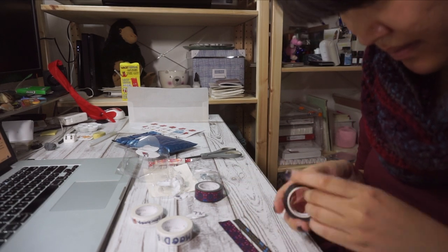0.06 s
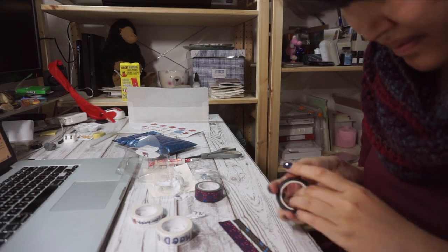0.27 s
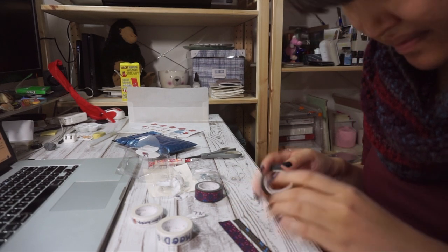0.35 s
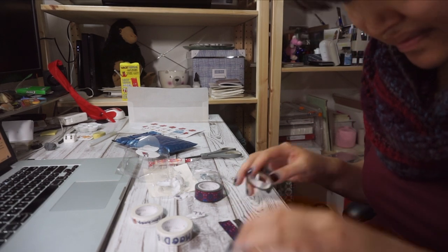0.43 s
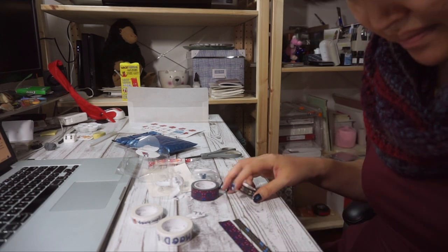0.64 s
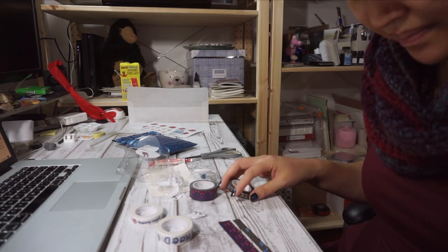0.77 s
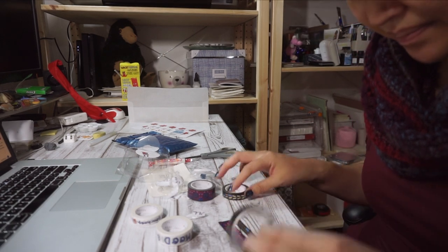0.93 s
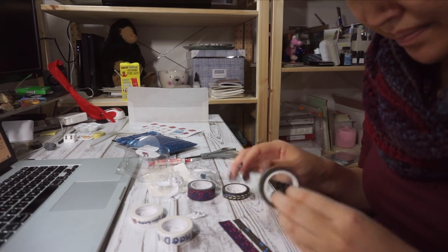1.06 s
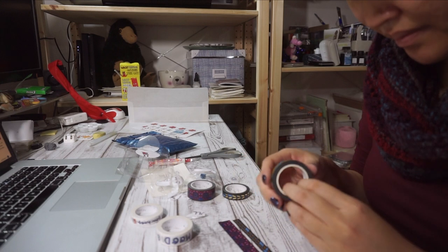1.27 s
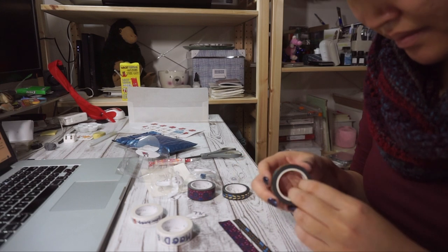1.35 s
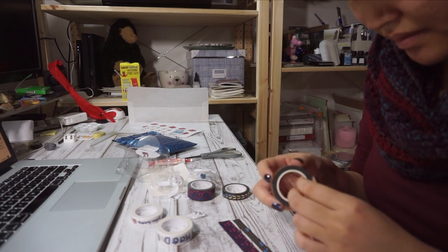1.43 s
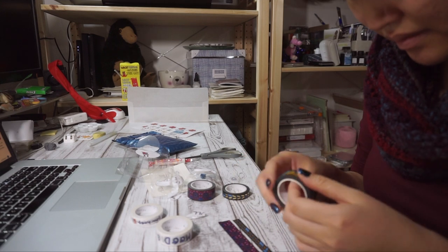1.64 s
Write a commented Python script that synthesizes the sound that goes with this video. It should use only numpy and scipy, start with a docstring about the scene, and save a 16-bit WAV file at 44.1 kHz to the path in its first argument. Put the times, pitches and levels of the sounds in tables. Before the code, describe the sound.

A tape roll knocks on a wooden table, close by, in a small room with steady fan noise and a thin whine. From 0.3 seconds a sleeve brushes softly; from 0.6 come finger bumps, faint nail ticks and light scraping. At 0.9 the roll lands sharply with two quick rebounds and brief wooden ringing. The fan noise dips and creeps back, with two faint bumps around 1.5 and 1.65.

```python
"""A small workroom with steady fan noise: a roll of tape is set down on a wooden table.
A sleeve brushes past, fingers bump the table, nails tick on the roll and it slides in stick-slip.
The roll lands with a sharp knock and two rebounds, ringing the modes of table and roll.
The knock drives a limiter down, so the room noise drops and creeps back."""
import sys
import numpy as np
from scipy import signal
from scipy.fft import rfft, irfft
from scipy.io import wavfile
from scipy.ndimage import uniform_filter1d, minimum_filter1d

SR = 44100
rng = np.random.default_rng(int(sys.argv[2]) if len(sys.argv) > 2 else 0)


def inscribe(sig):
    """Save sig as 16-bit PCM at rate SR to the path in sys.argv[1].

    A 1-D sig is mono; a 2-D sig holds one channel per row.
    Samples are clipped to [-1, 1] before scaling.
    """
    pcm = np.round(np.clip(np.atleast_2d(sig).T, -1, 1) * 32767)
    wavfile.write(sys.argv[1], SR, pcm.astype(np.int16))


N = 74970
TIME = np.arange(N) / SR
BUMP_LOW_HZ = 302
HELD_DAMPING = 1.67   # decay rate factor under a hand
WHITE = [(20, 0), (20000, 0)]   # flat spectrum: (frequency [Hz], density [dB/Hz])
# rim landing and rebounds: (time [s], level [dB], thud re level [dB])
LANDINGS = [(0.8930, 9.5, -13.5), (0.9290, -4.5, -8.5), (0.9470, -1.5, -11.5)]


def knocks():
    """The hard rim lands: clack, thud, crack and a brief rim tone. Returns (contact, wood ringing)."""
    clack_band_hz, thud_band_hz, crack_band_hz = (965, 2140), (312, 720), (5460, 10800)
    clack_top_hz = 3350   # limited by contact duration
    first_db = LANDINGS[0][1]
    contact = 0
    for s, db, thud_db in LANDINGS:
        clack = butter(pulse(s, db, *clack_band_hz), clack_top_hz, "low")
        crack = pulse(s, 2 * db - first_db - 8, *crack_band_hz)   # grows as force squared
        thud = pulse(s, db + thud_db, *thud_band_hz)
        contact += clack + crack - thud
    force = sum(from_db(db) * click(s) for s, db, _ in LANDINGS)
    rim = mode(hz=1897, db=-17.5, t60_s=0.034)
    return contact + signal.fftconvolve(force, rim)[:N], wood(force)


def wood(force, damping=1):
    """Modes of table and roll swell in and ring out, slightly earlier in the left ear."""
    # table and roll modes: (frequency [Hz], level [dB], t60 [s])
    modes = [(336, -36, 0.33), (385, -34, 0.13), (651, -56, 0.99), (687.5, -33, 0.3), (835, -26.5, 0.13),
             (858, -27, 0.13), (1156, -36.5, 0.2), (1303, -37, 0.23), (1443, -32, 0.28),
             (1494, -30.5, 0.26), (1549, -27.5, 0.2), (1740, -49, 0.12), (1787, -38, 0.15),
             (1790, -29, 0.24), (2000, -38.5, 0.5), (2383, -50, .38), (2336, -31, 0.13), (2290, -47, 0.31),
             (2880, -26.5, 0.23), (6350, -43, 0.26)]
    rise_s, lead_s = 0.0052, np.array([[0.00008], [0]])
    ringing = sum((-1) ** k * mode(hz, db, t60_s / damping, lead_s)
                  for k, (hz, db, t60_s) in enumerate(modes))
    swell = 1 - np.exp(-TIME / rise_s)
    return signal.fftconvolve(force[None], ringing * swell, axes=1)[:, :N]


def boom():
    """The table's lowest mode swells after the landing and dies away."""
    mode_hz, rise_s = 111, 0.027
    landing_s, landing_db = LANDINGS[0][:2]
    age_s = np.maximum(TIME - landing_s, 0)
    swell = (age_s / rise_s) ** 2 * np.exp(-age_s / rise_s)
    return from_db(landing_db - 31.5) * swell * np.sin(2 * np.pi * mode_hz * age_s)


def bumps():
    """Soft contacts thud and stir the lower modes, damped by the hand. Returns (thuds, ringing)."""
    # finger and roll bumps: (time [s], level [dB], upper edge [Hz])
    contacts = [(0.5963, -22.5, 1260), (0.605, -16.5, 880), (0.61, -18, 746), (0.6363, -20, 1300),
                (0.6399, -21.5, 880), (0.6940, -25.5, 1850), (0.7315, -44, 3100), (0.754, -22, 2470),
                (0.771, -34, 2000), (1.5088, -28, 450), (1.6524, -34, 392)]
    thuds = sum(pulse(s, db, BUMP_LOW_HZ, top_hz) for s, db, top_hz in contacts)
    force = sum(butter(from_db(db) * click(s), top_hz, "low") for s, db, top_hz in contacts)
    return thuds, from_db(13) * wood(force, HELD_DAMPING)


def slides():
    """The roll sticks and slips in dense tiny clicks that stir the wood. Returns (scrape, ringing)."""
    # strokes over the wood: (start [s], end [s], level [dB], centre [Hz], width [Hz])
    strokes = [(0.574, .63, -33, 351.9, 277.8), (0.577, 0.659, -47, 2890, 700),
               (0.582, 0.652, -51, 4620, 1190), (0.72, 0.853, -39.5, 370, 290),
               (0.744, 0.804, -43, 1296, 1110), (0.81, 0.854, -42.5, 2840, 700),
               (0.824, .864, -57, 4850, 700)]
    slips_per_s, spread_db, edge_s, dull_hz, ring_db = 2500, 4, 0.011, 5960, -4
    scrape = 0
    for start_s, end_s, db, hz, width_hz in strokes:
        sizes = from_db(spread_db * np.minimum(rng.exponential(1, N), 4))
        signs = rng.choice([-1, 1], N)
        slipping = rng.random(N) < slips_per_s / SR
        slips = butter(sizes * signs * slipping, dull_hz, "low", order=1)
        friction = resonate(resonate(slips, hz, width_hz), hz, 2 * width_hz)
        envelope = np.clip(np.minimum(TIME - start_s, end_s - TIME) / edge_s, 0, 1)
        scrape += from_db(db) * envelope * friction
    scrape = butter(scrape, BUMP_LOW_HZ / 2, "high")
    ringing = wood(scrape, HELD_DAMPING)
    return scrape, from_db(ring_db) * ringing * scrape.std() / ringing.std()


def taps():
    """Fingernails tick on the roll, whose hard core rings briefly."""
    # nail taps: (time [s], level [dB])
    ticks = [(0.598, -54), (0.606, -47), (0.620, -51), (0.694, -53), (0.7315, -40), (0.743, -47.5),
             (0.754, -41.5), (0.7659, -41), (0.819, -41), (0.83, -43), (0.845, -50), (0.862, -41.5)]
    # core modes: (frequency [Hz], level [dB], t60 [s])
    core_modes = [(1560, -2, 0.032), (2930, -5.5, 0.028), (3166, -5, 0.045), (4960, -4.5, 0.033),
                  (6200, -2.5, 0.032)]
    force = sum(from_db(db) * click(s) for s, db in ticks)
    ringing = sum(mode(hz, db, t60_s) for hz, db, t60_s in core_modes)
    return signal.fftconvolve(force, ringing)[:N]


def sleeve():
    """Cloth hisses as the arm reaches over the table."""
    # brushing envelope: (time [s], gain [dB])
    brushing = [(.28, -14.5), (.39, -8), (.47, -1.5), (.55, -3.5), (.6, 2), (.67, -8), (.72, -11),
                (.85, -4), (.88, -24)]
    # cloth spectrum at unit gain: (frequency [Hz], density [dB/Hz])
    cloth = [(100, -76.5), (300, -62), (700, -82), (1450, -70), (1800, -76.5), (2500, -74), (3700, -82.5),
             (6500, -83), (8200, -85.5), (9700, -83.5), (15500, -92.5)]
    end_s, fade_s = 0.89, 0.0085
    envelope = from_db(np.interp(TIME, *np.transpose(brushing)))
    fade = np.clip((end_s - TIME) / fade_s, 0, 1)
    return envelope * fade * diffuse(cloth)


def reflections(x):
    """Two near, dulled echoes off laptop and shelves."""
    # echoes: (delay [s], gain [dB], upper edge [Hz], right ear lag [s])
    echoes = [(.0046, -5, 760, 0.000033), (.0103, -13.5, 6500, 0.00059)]
    near = 0
    for s, db, top_hz, lag_s in echoes:
        dulled = butter(x, top_hz, "low", order=1)
        near += from_db(db) * np.array([delay(dulled, s), delay(dulled, s + lag_s)])
    return near


def reverb(x):
    """The room's diffuse tail dies band by band."""
    # room tail: (frequency [Hz], level [dB], t60 [s])
    decay = [(101, 3.5, 0.87), (344, -4.5, 0.58), (680, -5, 0.5), (1400, -5, 0.51), (1970, -1.5, .42),
             (3080, 8.5, 0.39), (4380, 1.5, 0.44), (6840, -8.5, 0.4), (13600, -17, 0.17)]
    gap_s, build_s = 0.0014, 0.002
    white = rfft(diffuse(WHITE) / np.sqrt(SR / 2))
    hz, edges_hz = np.fft.rfftfreq(N, 1 / SR), np.geomspace(60, 18000, 20)
    tail = 0
    for low_hz, high_hz in zip(edges_hz, edges_hz[1:]):
        centre_hz = np.sqrt(low_hz * high_hz)
        rate_per_s = np.log(1000) / at_hz(decay, centre_hz, column=2)
        envelope = np.sqrt(2 * rate_per_s / SR) * np.exp(-rate_per_s * TIME)   # unit energy
        band = irfft(white * (hz >= low_hz) * (hz < high_hz), N)
        tail += from_db(at_hz(decay, centre_hz)) * envelope * band
    tail *= np.clip((TIME - gap_s) / build_s, 0, 1)
    return signal.fftconvolve(x[None], tail, axes=1)[:, :N]


def room_noise():
    """A low steady rush with a thin, wavering fan whine."""
    # steady rush: (frequency [Hz], density [dB/Hz])
    rush = [(20, -75), (47, -66.5), (68, -77), (120, -67), (200, -63.5), (290, -63), (430, -69),
            (550, -75.5), (850, -77), (1060, -85.5), (1400, -78.5), (1750, -93.5), (2200, -96), (4200, -94),
            (5100, -93), (6500, -97.5), (15500, -99)]
    # fan whine: (centre [Hz], width [Hz], rms [dB])
    whine_bands = [(1898, 79, -61.5), (5120, 63, -68)]
    white = diffuse(WHITE)
    whine = sum(from_db(db) * resonate(resonate(white, hz, 2 * width_hz), hz, 2 * width_hz)
                for hz, width_hz, db in whine_bands)
    return diffuse(rush) + whine


def fan_tone():
    """The whine's core: a faint, even tone with slightly wandering pitch."""
    centre_hz, wander_hz, rms_db = 1944, 12.3, -61
    wander = butter(rng.standard_normal(N), 28, "low")
    pitch_hz = centre_hz + wander_hz * wander / wander.std()
    return from_db(rms_db) * np.sqrt(2) * np.sin(2 * np.pi * np.cumsum(pitch_hz) / SR)


def diffuse(spectrum):
    """Stereo noise of a given density, most alike between the ears in the bass."""
    # left-right likeness: (frequency [Hz], coherence [0-1])
    coherence = [(60, .99), (250, 1), (600, 0.8), (1200, 0.48), (2200, 0.58), (4000, 0), (15000, 0)]
    lag_s = np.array([[0], [0.00006]])   # right ear later
    hz = np.fft.rfftfreq(N, 1 / SR)
    alike = at_hz(coherence, hz)
    mid, side = rfft(rng.standard_normal((2, N)))
    pair = np.sqrt((1 + alike) / 2) * mid + np.sqrt((1 - alike) / 2) * side * [[1], [-1]]
    pair *= np.exp(-2j * np.pi * hz * lag_s)
    return irfft(pair * from_db(at_hz(spectrum, hz)) * np.sqrt(SR / 2), N)


def mode(hz, db, t60_s, lead_s=0):
    """Decaying sine; lead_s advances its phase."""
    return from_db(db - 60 * TIME / t60_s) * np.sin(2 * np.pi * hz * (TIME + lead_s))


def pulse(s, peak_db, low_hz, high_hz):
    """Band-limited contact pulse."""
    y = butter(click(s), [low_hz, max(high_hz, 1.2 * low_hz)], "band")
    return from_db(peak_db) * y / abs(y).max()


def click(s):
    """Unit impulse at time s."""
    return signal.unit_impulse(N, int(round(s * SR)))


def resonate(x, hz, width_hz):
    """One resonance, scaled to rms 1."""
    r = np.exp(-np.pi * width_hz / SR)
    y = signal.lfilter([1, 0, -1], [1, -2 * r * np.cos(2 * np.pi * hz / SR), r * r], x)
    return y / y.std()


def butter(x, hz, kind, order=2):
    """Causal Butterworth filter."""
    return signal.sosfilt(signal.butter(order, hz, kind, fs=SR, output="sos"), x + 1e-18)


def delay(x, s):
    """Fractional delay."""
    return np.interp(TIME - s, TIME, x, left=0)


def at_hz(points, hz, column=1):
    """Table column interpolated over log frequency."""
    table = np.array(points)
    return np.interp(np.log(np.maximum(hz, 1)), np.log(table[:, 0]), table[:, column])


def from_db(db):
    """Decibels to gain."""
    return 10 ** (np.asarray(db) / 20)


def scene():
    """Handling sounds in the room, over its steady noise."""
    pan_db, left_lag_s, soft_send_db = 0.17, 0.00004, -5.5
    knock, knock_ring = knocks()
    bump, bump_ring = bumps()
    slide, slide_ring = slides()
    soft = bump + slide + taps()
    contact = knock + soft
    direct = np.array([delay(contact, left_lag_s), contact]) * from_db([[pan_db], [-pan_db]])
    ringing = knock_ring + bump_ring + slide_ring + boom()
    send = knock + from_db(soft_send_db) * soft
    return direct + ringing + reflections(send) + reverb(send) + sleeve() + room_noise() + fan_tone()


def record(dry):
    """A limiter ducks at once and releases slowly; a steep low-pass cuts the top."""
    ceiling_db, release_db_per_s, lookahead_s, stop_hz = -0.67, 7.5, 0.00067, 16300
    peak_db = 20 * np.log10(abs(dry).max(axis=0) + 1e-9)
    over_db = np.maximum(peak_db - ceiling_db, 0)
    release_db = release_db_per_s * TIME
    held_db = np.maximum.accumulate(over_db + release_db) - release_db
    ahead = int(lookahead_s * SR)
    gain_db = uniform_filter1d(minimum_filter1d(-held_db, 2 * ahead + 1), ahead)
    lowpass = signal.cheby2(16, 70, stop_hz, fs=SR, output="sos")
    return signal.sosfilt(lowpass, dry * from_db(gain_db))


dry = scene()
out = record(dry)
inscribe(out)
```